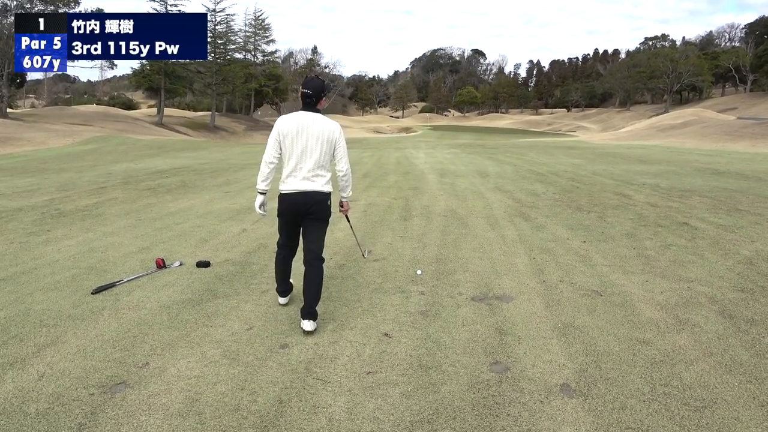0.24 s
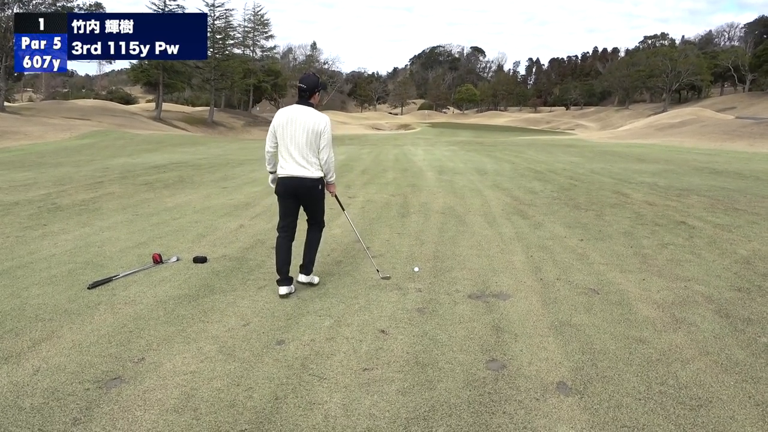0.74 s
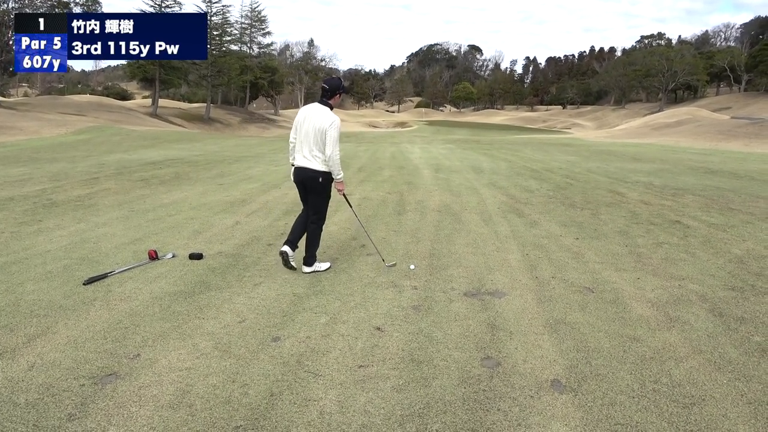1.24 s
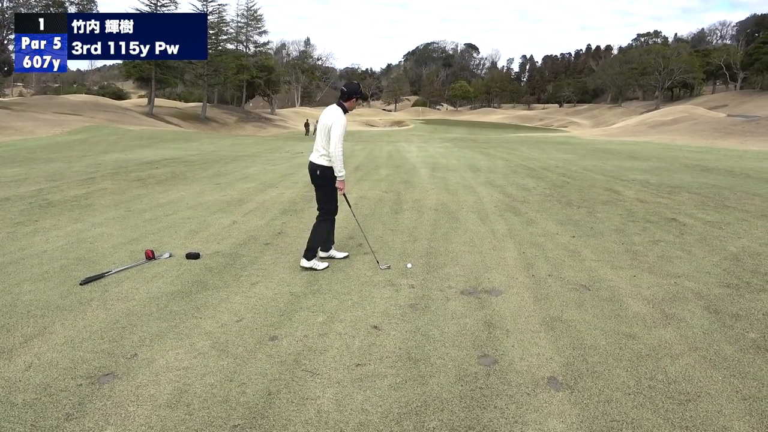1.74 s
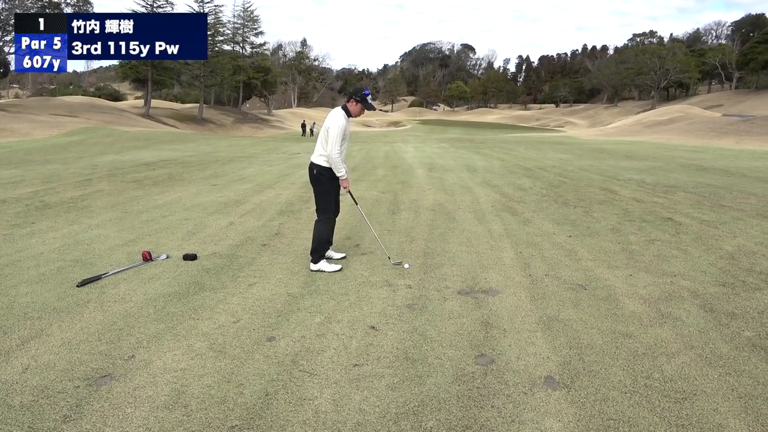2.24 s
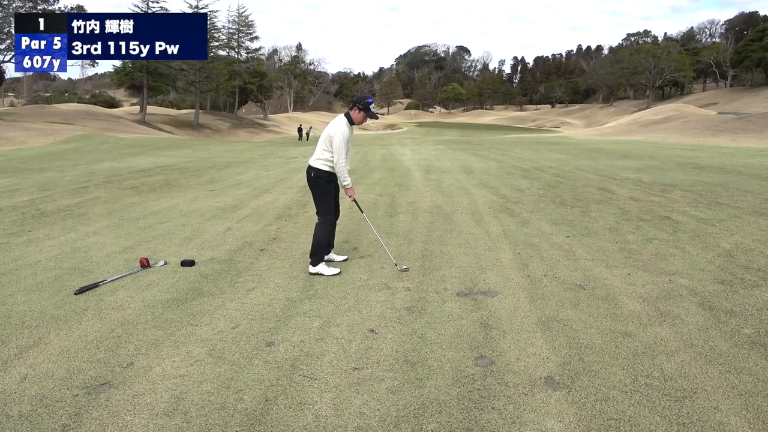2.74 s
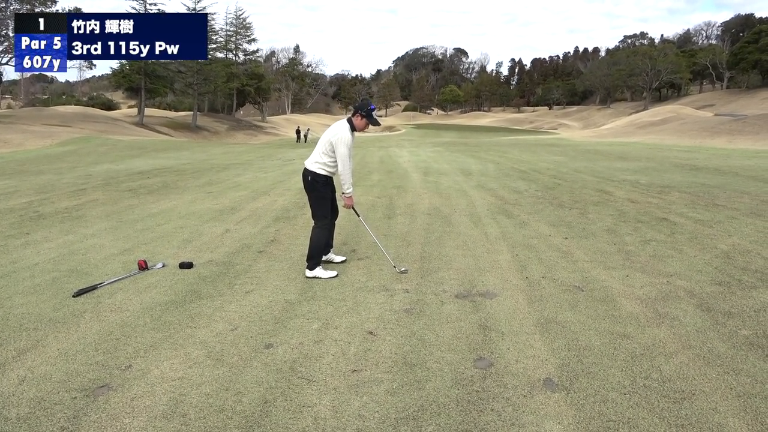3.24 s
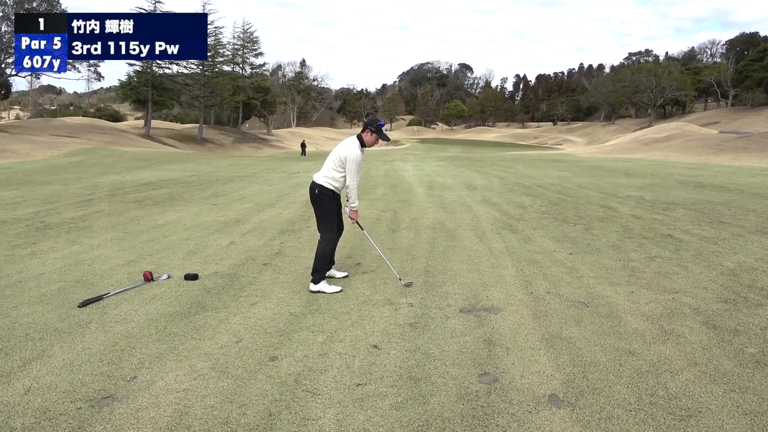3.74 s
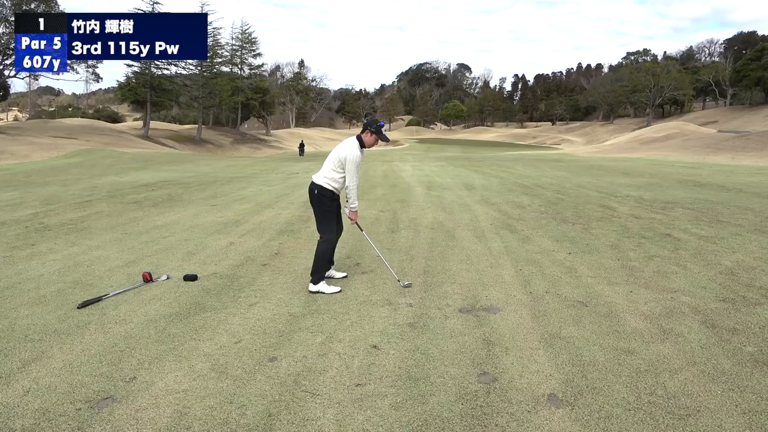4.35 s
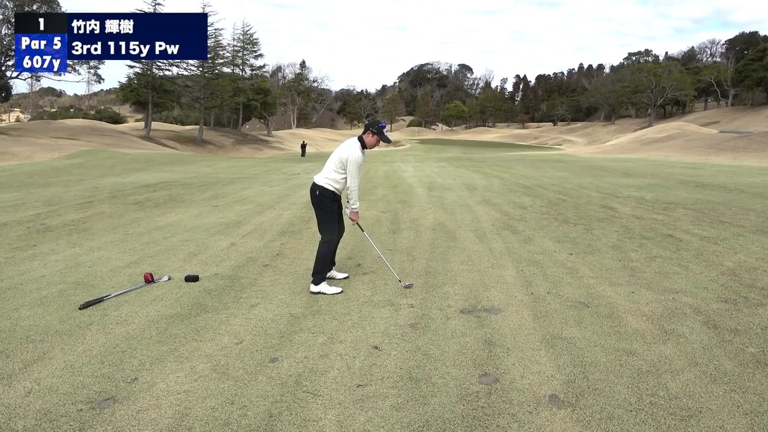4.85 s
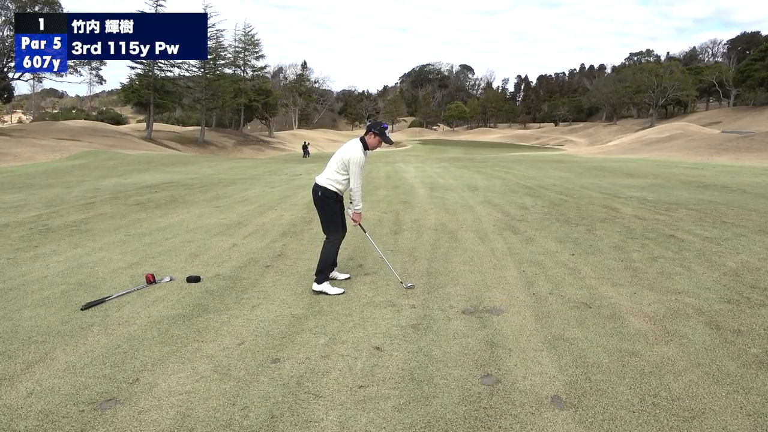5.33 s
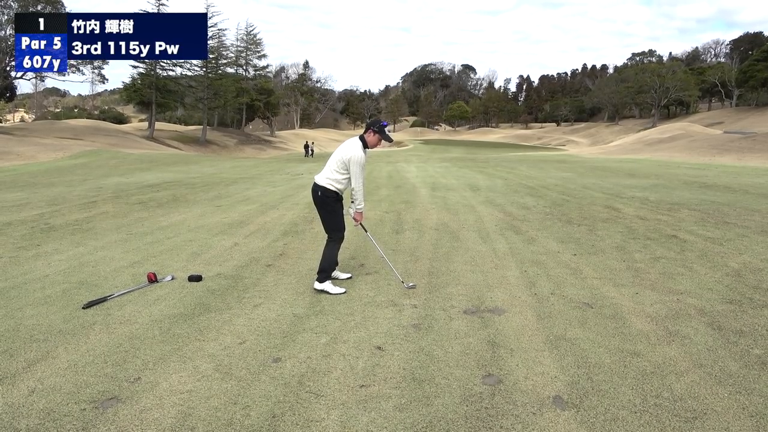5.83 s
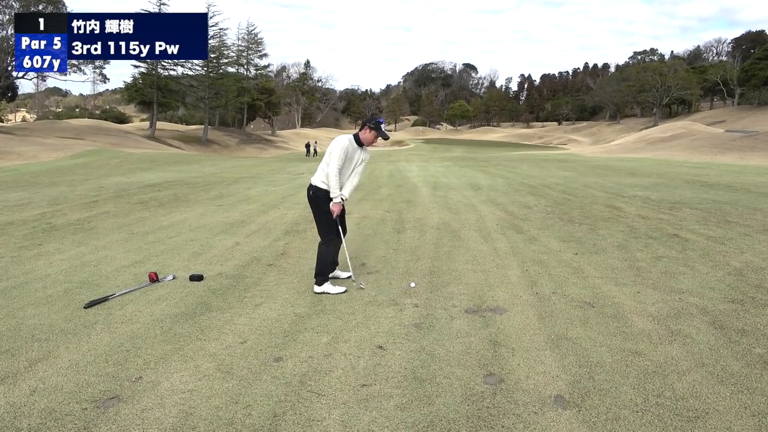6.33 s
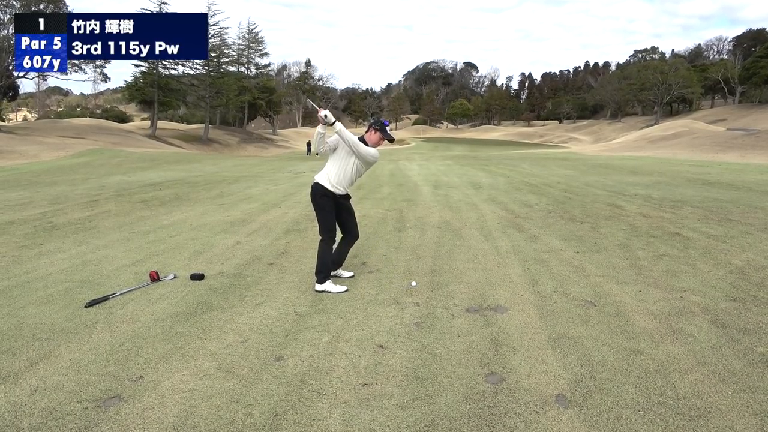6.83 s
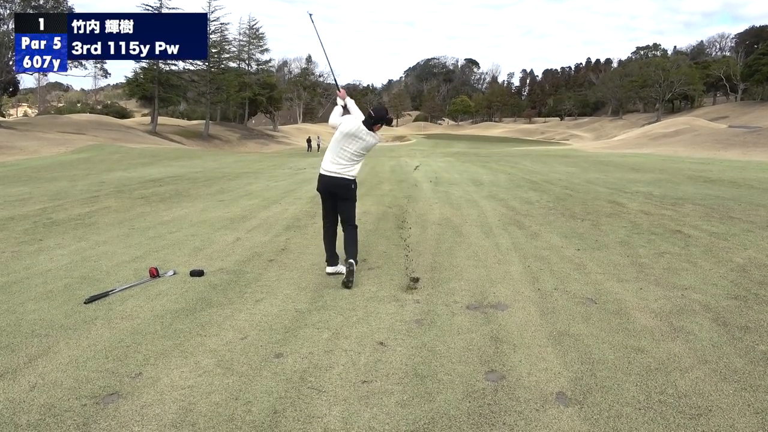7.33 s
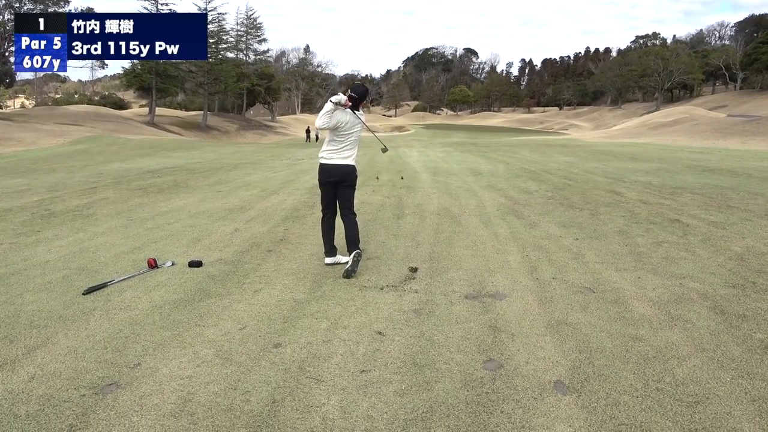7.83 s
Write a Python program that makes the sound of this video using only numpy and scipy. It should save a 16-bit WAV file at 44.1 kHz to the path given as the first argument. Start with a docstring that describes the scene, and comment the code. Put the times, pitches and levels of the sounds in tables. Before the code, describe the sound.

Low, clipped wind noise dominates throughout, over distant trees roaring softly and faint hiss. Two abrupt edits pop, one right at the start and one before the midpoint. Faint steps and grass scuffs come early, then tiny ticks. Near the end a fast whoosh leads into a hard, dry golf shot with a tearing divot, grassy debris and a last gust.

```python
"""A wedge shot on a windy fairway, heard by an unshielded microphone a few metres away.
Filtered-noise gusts overload the capsule from the start, over far trees, rustling dry grass and hiss; rough
buffeting stops at the first of two hard edit cuts, which pop. Zigzag buzzes, noise sweeps of feet in grass and
ringing ticks follow. Near 7 s the club swings back and swishes as swelling noise, clicks the ball with a pulse and
ringing modes, and tears the turf in a noise burst; grainy soil sprays and patters, chaff rustles, clods tick down."""
import sys
import numpy as np
from scipy import signal
from scipy.fft import rfft, irfft, next_fast_len
from scipy.io import wavfile
from scipy.ndimage import uniform_filter1d

SR = 44100
rng = np.random.default_rng(int(sys.argv[2]) if len(sys.argv) > 2 else 0)


def boost_factor(decibels):
    """Convert a level in decibels to a linear amplitude factor."""
    exponent = np.asarray(decibels, float) / 20
    return 10 ** exponent


def waveform_to_disk(signal):
    """Save audio, clipped to [-1, 1], as 16-bit WAV at the path in sys.argv[1]."""
    frames = np.transpose(np.atleast_2d(signal))
    scaled = np.clip(frames, -1, 1) * 32767
    samples = np.round(scaled).astype(np.int16)
    wavfile.write(sys.argv[1], SR, samples)


N = 356328
TIME_S = np.arange(N) / SR
DIVOT_S, DIVOT_RISE_S = 7.148, 0.0036   # the sole cuts the turf


def rms_one(x):
    """Scale to unit rms."""
    return x / np.sqrt(np.mean(x ** 2) + 1e-20)


def drift(rate):
    """Slow chance: straight lines between normal draws, `rate` of them per second."""
    knots = rng.standard_normal(int(N / SR * 100) + 4)
    return np.interp(TIME_S * rate, np.arange(len(knots)), knots)


def coloured(spectrum, source):
    """Give a white source the spectrum's shape, silent beyond its ends, at unit rms."""
    size = next_fast_len(N)
    hz, db = np.transpose(spectrum)
    log_hz = np.log(np.arange(size // 2 + 1) * SR / size + 1)
    gain = boost_factor(np.interp(log_hz, np.log(hz), db, left=-200, right=-200))
    return rms_one(irfft(rfft(source, size) * gain, size)[:N])


def lumpy(spectrum, patchy_db, rate):
    """Coloured noise whose strength wavers in lumps."""
    return coloured(spectrum, rng.standard_normal(N) * boost_factor(patchy_db * drift(rate)))


def evened(x, window_s):
    """Flatten the chance swells of a narrow noise so that the gust alone sets its strength."""
    size = int(window_s * SR)
    power = uniform_filter1d(uniform_filter1d(x ** 2, size), size)
    return x / np.sqrt(power + 0.0085)


def grains(per_s, spread_db):
    """Random snaps of blades and soil, few large and many small, at unit rms."""
    sizes = boost_factor(spread_db * np.minimum(rng.exponential(1, N), 5))
    signed = sizes * rng.choice([-1, 1], N)
    return rms_one(signed * (rng.random(N) < per_s / SR))


def swell(s, db, rise_s, fade_s):
    """Exponential rise to a peak at s, exponential fade after it."""
    since = TIME_S - s
    return boost_factor(db) * np.exp(np.where(since < 0, since / rise_s, -since / fade_s))


def bell(s, rise_s, fall_s):
    """Smooth swell to 1 at s, with its own width on each side."""
    since = TIME_S - s
    return np.exp(-(since / np.where(since < 0, rise_s, fall_s)) ** 2 / 2)


def bandpass(x, order, low_hz, high_hz):
    """Keep one band of the sound."""
    return signal.sosfilt(signal.butter(order, [low_hz, high_hz], "band", fs=SR, output="sos"), x)


def ring_noise(hz, width_hz):
    """Noise through a narrow band around hz."""
    return bandpass(rng.standard_normal(N), 2, hz - width_hz / 2, hz + width_hz / 2)


def ring(events, hz, t60):
    """Clicks at (s, dB) set a sine ringing that decays by 60 dB in t60 seconds."""
    clicks = np.full(N, 1e-18)   # a trace of signal keeps the resonator's arithmetic fast
    for s, db in events:
        clicks[round(s * SR)] = boost_factor(db)
    r, w = boost_factor(-60 / (t60 * SR)), 2 * np.pi * hz / SR
    return signal.lfilter([0, np.sin(w)], [1, -2 * r * np.cos(w), r * r], clicks)


# Wind at the capsule: t/s, strength level/dB, fineness of the eddies/dB (lifts thuds and flutter)
WIND = [(0, -6, 0), (.2, -13.5, 3.5), (.36, -6.5, -1), (.75, -7, 0), (1.1, -12, 1), (1.33, -8.5, 3),
        (1.55, -13.5, 1.5), (2.0, -16.5, 3), (2.22, -14, 0), (2.39, -27, -4.5), (2.5, -11, -4.5),
        (2.62, -16.5, 0.5), (2.9, -10, -0.5), (3.3, -12.5, 2), (3.78, -17, -2.5), (3.95, -8, -5.5),
        (4.25, -8.5, -4.5), (4.62, -17.5, 1.5), (4.95, -12, 0), (5.28, -11.5, -2.5), (5.55, -13.5, 1.5),
        (5.84, -17, -3), (5.92, -9.5, -3.5), (6.3, -10, -2), (6.43, -17.5, -3), (6.5, -11.5, -3),
        (6.8, -9, -2), (7.07, -13, -4.5), (7.2, -19, -4), (7.4, -22.5, -11.5), (7.52, -19.5, -4),
        (7.73, -22.5, -4.5), (7.79, -9, 1), (8.02, -6.5, 2.5), (8.08, -20.5, 5)]
# Small sharp eddies that thump the capsule: t/s, lift level/dB
PUFFS = [(.11, 3), (.4, 6), (.72, 5.5), (1.15, 2), (1.35, 4.5), (1.63, 5.5), (2.48, 3.5), (3.38, 3.5),
         (3.96, 3.5), (4.78, 5.5), (4.94, 4.5), (5.28, 2.5), (5.68, 4.5), (5.89, 4), (5.99, 6), (6.07, 4),
         (6.17, 4.5), (6.28, 4), (6.34, 2), (6.48, 6.5), (6.67, 5), (6.78, 7), (7.0, 2.5), (7.58, 0.5),
         (7.79, 4.5), (7.87, 2.5), (7.99, 3)]
# Spectra of the three wind layers: f/Hz, relative level/dB per Hz
RUMBLE = [(7.1, -18), (12, -0.5), (27, 0), (45, -6.5), (58, -32), (99, -120)]
THUD = [(26, -32), (45, -0.5), (110, -18), (140, -50.5), (240, -120)]
FLUTTER = [(65, -32), (110, -3.5), (200, -13.5), (400, -32.5), (630, -46), (1200, -62.5), (2600, -92.5)]
RUMBLE_DB, THUD_DB, FLUTTER_DB = -0.5, -7.5, -24.5   # each layer against the wind's strength
THUD_FOLLOWS = 0.95   # dB per dB of strength
EDDY_DB, THUD_EDDY_DB, EDDIES_PER_S = 2.5, 1.5, 14   # single eddies swell and fade around the gust
PUFF_S = .025


def wind(top=1.6):
    """Eddies push the capsule: rumble, thuds and flutter; the diaphragm stiffens at large swings."""
    s, strengths, finenesses = np.transpose(WIND)
    strength_db = np.interp(TIME_S, s, strengths)
    fine_db = np.interp(TIME_S, s, finenesses)
    mean_db = strength_db.mean()
    puffs_db = sum(db * bell(at, PUFF_S, PUFF_S) for at, db in PUFFS)
    sharp_db = puffs_db + THUD_EDDY_DB * drift(EDDIES_PER_S)

    rumble_db = strength_db + RUMBLE_DB + EDDY_DB * drift(EDDIES_PER_S)
    thud_db = mean_db + THUD_FOLLOWS * (strength_db - mean_db) + THUD_DB + fine_db + sharp_db
    flutter_db = strength_db + FLUTTER_DB + fine_db + 0.95 * sharp_db

    rumble = evened(coloured(RUMBLE, rng.standard_normal(N)), window_s=0.098)
    thud = evened(coloured(THUD, rng.standard_normal(N)), window_s=0.096)
    push = boost_factor(rumble_db) * rumble + boost_factor(thud_db) * thud
    shed = 1 + 0.39 * uniform_filter1d(thud ** 2, size=600)   # flutter is shed by the stronger thuds
    flutter = boost_factor(flutter_db) * lumpy(FLUTTER, patchy_db=0.5, rate=40) * shed
    return top * np.tanh((push + flutter) / top)


# Spectrum of the rough close buffeting: f/Hz, relative level/dB per Hz
BUFFET = [(120, -36), (200, -3), (594, -8), (696, -12.5), (762, -3.5), (863, -21), (1020, -16.5),
          (1600, -31.5), (3000, -60), (3900, -80), (6600, -120)]
BUFFET_DB = -34.5


def buffet():
    """Air tumbling right over the grille, lumpy noise silenced by the first cut."""
    return boost_factor(BUFFET_DB) * lumpy(BUFFET, patchy_db=0.5, rate=60) * (TIME_S < CUTS[0][0])


# Beds of the three stretches between the cuts: far roar level/dB, steady rustle level/dB
STRETCHES = [(-45.5, -72), (-48.5, -63.5), (-57.5, -76.5)]


def bed_levels():
    """Roar and rustle levels in dB, switched at the cuts."""
    stretch = np.searchsorted([s for s, _ in CUTS], TIME_S)
    return np.array(STRETCHES)[stretch].T


# Spectrum of the far trees: f/Hz, relative level/dB per Hz
ROAR = [(180, -27.5), (300, 0.5), (480, -3.5), (630, -9), (970, -17), (1300, -28), (2000, -37), (4000, -50)]
# Faint tones around which level and phase waver: f/Hz, level/dB
HUMS = [(480, -57), (630, -60), (955, -67)]
ROAR_SWELL_DB, ROAR_FADE_S = 11.5, 0.28   # the roar swells up to the first cut and dies down after it


def trees():
    """Smooth far roar of noise, with faint wavering tones between the two cuts."""
    first_s, second_s = CUTS[0][0], CUTS[1][0]
    roar_db = bed_levels()[0] + ROAR_SWELL_DB * np.exp(-abs(TIME_S - first_s) / ROAR_FADE_S)
    roar = boost_factor(roar_db) * lumpy(ROAR, patchy_db=1.5, rate=20)
    tones = np.zeros(N)
    for hz, db in HUMS:
        tone = np.sin(2 * np.pi * hz * TIME_S + 0.57 * drift(12))
        tones += tone * boost_factor(db + 1.2 * drift(3.2))
    return roar + tones * (TIME_S > first_s) * (TIME_S < second_s)


# Shoes, club and clothes brush by: t/s, peak level/dB, fade/s
BRUSHES = [(.044, -53, .04), (.425, -57, 0.03), (.525, -58.5, .03),  (.955, -61, 0.022), (1.05, -60, 0.05),
           (3.12, -59.5, .05), (5.12, -65, .006), (6.2, -70.5, .08), (6.94, -63.5, 0.11), (7.0, -68, 0.037),
           (7.38, -62, 0.031), (8.0, -67, .02)]
# Spectrum of rustling grass: f/Hz, relative level/dB per Hz
RUSTLE = [(710, -28.5), (1200, -1.5), (6850, -14), (8400, -14), (10100, -22.5), (12800, -17.5),
          (15700, -26)]
RUSTLE_FLICKER_DB, RUSTLE_FLICKERS_PER_S = 2, 30
BRUSH_RISE_S = 0.011   # or the fade time, if that is shorter
BLADES_DB, BLADES_FADE_S = -46.5, 0.08   # cut grass thrown up


def grass():
    """Hiss with a share of tiny snaps: a flickering bed, the brushes and the grass that the club throws."""
    bed = boost_factor(bed_levels()[1] + RUSTLE_FLICKER_DB * drift(RUSTLE_FLICKERS_PER_S))
    brush_power = sum(swell(s, db, min(BRUSH_RISE_S, fade_s), fade_s) ** 2 for s, db, fade_s in BRUSHES)
    thrown = swell(DIVOT_S, BLADES_DB, DIVOT_RISE_S, BLADES_FADE_S)
    level = np.sqrt(bed ** 2 + brush_power + thrown ** 2)
    source = rng.standard_normal(N) + 0.44 * grains(per_s=4500, spread_db=6.0)
    return level * coloured(RUSTLE, source)


# Spectrum of the microphone's self-noise: f/Hz, relative level/dB per Hz
HISS = [(710, -30), (1200, -1), (2690, -7), (2900, -6.5), (5640, -11.5), (10600, -18.5), (15000, -21.5),
        (15700, -18)]
HISS_DB = -69


def hiss():
    """Steady self-noise of the microphone."""
    return boost_factor(HISS_DB) * coloured(HISS, rng.standard_normal(N))


# Hard edit cuts: t/s, level/dB of the drop in pressure
CUTS = [(.14409, -1.5), (3.64758, -11.5)]


def cuts(settle_s=0.011):
    """Unrelated pressures meet: high before the join, low after it."""
    pops = np.zeros(N)
    for s, db in CUTS:
        since = TIME_S - s
        pops -= boost_factor(db) / 2 * np.sign(since) * np.exp(-abs(since) / settle_s)
    return pops


# Brief narrow hisses, near the shoes and faint high ones: t/s, level/dB, half length/s, f/Hz, width/Hz
WHEEZES = [(.308, -50, .012, 1150, 300), (.308, -63, .01, 2500, 300), (.428, -58, .016, 2800, 1200),
           (.527, -59, .006, 3200, 500), (5.41, -85, .06, 12000, 900), (5.7, -87, .06, 12000, 900)]


def wheezes():
    """Each a soft swell of noise around one pitch."""
    out = np.zeros(N)
    for s, db, span_s, hz, width_hz in WHEEZES:
        out += boost_factor(db) * rms_one(ring_noise(hz, width_hz)) * bell(s, span_s, span_s)
    return out


# Short buzzes of the overdriven capsule:
# t/s, zigzag level/dB before pace and filters, length/ms, nominal f/Hz that the pace bends
BUZZES = [(0.339, -43.5, 4.5, 1200), (.36, -47, 2, 1200), (.405, -47, 3.5, 1000), (0.4283, -43, 4, 1200),
          (.443, -47, 4, 1200), (.47, -47, 2, 900), (.502, -43, 4, 1183), (.52, -44, 3, 1000),
          (0.568, -36, 6.8, 849), (0.6232, -45.5, 3, 1200), (0.629, -42, 4.8, 1197), (.641, -46, 3, 1100),
          (.705, -45, 2, 1200), (.735, -47, 2, 1000), (3.922, -40, 4.6, 1550), (3.9605, -36.5, 2.6, 733),
          (4.1685, -36.5, 2.44, 960), (5.005, -39.5, 2.1, 1200), (5.278, -38, 2.7, 999),
          (6.045, -38, 7.8, 1400), (6.067, -46, 1.1, 1500), (6.0742, -46, 1.1, 1500),
          (6.1225, -39.5, 4.2, 1650), (6.675, -43, 1.2, 1400), (6.68, -38, 3.5, 1250),
          (6.7775, -39, 3.2, 1700), (6.803, -47, 1.2, 1400), (6.8085, -39.5, 3, 1400),
          (7.954, -49, 2.8, 1156), (8.0, -37, 1.6, 1196), (8.029, -39, 3.7, 1100)]
BUZZ_HURRY, BUZZ_FASTEST, BUZZ_UNEVEN = .5, .4, .3   # rate bend (ln), where it peaks (0-1), chance in it (ln)
BUZZ_STOP_HZ, BUZZ_RING_HZ = 3000, 3900   # the capsule dulls the corners but rings at one pitch
BUZZ_RING_DB, BUZZ_EDGE_DB = 2.5, -12   # ringing, and the share of corners left sharp


def buzzes():
    """A sharp-cornered zigzag of steady slope: wide slow swings open and close it, small quick ones between."""
    out, wobble = np.zeros(N), rng.standard_normal((len(BUZZES), 8))
    for (s, db, ms, hz), knots in zip(BUZZES, wobble):
        u = np.linspace(0, 1, int(ms / 1000 * SR))
        hurry = BUZZ_HURRY * np.interp(u, [0, BUZZ_FASTEST, 1], [-1, 1, -1])
        uneven = BUZZ_UNEVEN * np.interp(u, np.linspace(0, 1, len(knots)), knots)
        pace = np.exp(hurry + uneven)
        phase = 2 * np.pi * np.cumsum(hz * pace) / SR - np.pi / 2
        zigzag = signal.sawtooth(phase, .5) / pace * signal.windows.tukey(len(u), .15)
        at = round(s * SR)
        out[at:at + len(u)] -= boost_factor(db) * (zigzag + 3.5 * np.bartlett(len(u)))   # rides on a pointed dip
    rung = signal.lfilter(*signal.iirpeak(BUZZ_RING_HZ, 6.0, fs=SR), out)
    dulled = signal.sosfilt(signal.cheby2(6, 30, BUZZ_STOP_HZ, fs=SR, output="sos"), out)
    edge = boost_factor(BUZZ_EDGE_DB)
    return dulled * (1 - edge) + edge * out + boost_factor(BUZZ_RING_DB) * rung


# A foot, or at 6.89 s the club's backswing, sweeps through the grass and stops:
# t/s, length/s, sweep level/dB, stop level/dB
SWEEPS = [(.35, .215, -67.5, -55.5), (0.898, .285, -68.5, -61.5), (1.624, .27, -68, -62),
          (2.18, .13, -67, -61), (2.592, 0.14, -68.5, -67.5), (2.98, .2, -66.5, -68), (3.438, .2, -67, -67),
          (6.89, .17, -72, -74)]
# Single stalks snap underfoot: t/s, level/dB (each swell is played 8 dB lower)
SNAPS = [(0.541, -46.5), (0.9005, -51.5), (0.9353, -46.5), (0.9506, -40.5), (0.983, -43.5), (1.0265, -47),
         (1.6246, -49.5), (1.684, -48), (2.1854, -50), (2.987, -50), (3.114, -47)]
# Spectrum of the blades: f/Hz, relative level/dB per Hz
BLADES = [(1000, -31.5), (2000, -1.5), (5000, -2), (7080, -7), (8510, -0.5), (10400, -10.5), (13000, -4),
          (15700, -10)]
# scuff as a sweep starts (dB over the sweep), crunch as it stops
SCUFF_DB, SCUFF_FADE_S, CRUNCH_RISE_S, SWEEP_EDGE_S = 4.5, .025, 0.029, 0.0055
SNAP_FADE_S = .005
CHAFF_DB, CHAFF_FADE_S = -64, 1.2   # cut grass drifting down


def sweeps():
    """Bright swish that switches on as a sweep starts and off as it stops; divot chaff rustles alike."""
    power = swell(DIVOT_S, CHAFF_DB, DIVOT_RISE_S, CHAFF_FADE_S) ** 2
    for s, length_s, db, stop_db in SWEEPS:
        end_s = s + length_s
        sweep = boost_factor(db) * np.clip(np.minimum(TIME_S - s, end_s - TIME_S) / SWEEP_EDGE_S, 0, 1)
        scuff = swell(s + SWEEP_EDGE_S, db + SCUFF_DB, SWEEP_EDGE_S / 2, SCUFF_FADE_S)
        crunch = swell(end_s - SWEEP_EDGE_S, stop_db, CRUNCH_RISE_S, SWEEP_EDGE_S / 2)
        power += sweep ** 2 + scuff ** 2 + crunch ** 2
    for s, db in SNAPS:
        power += swell(s, db - 8, SNAP_FADE_S / 2, SNAP_FADE_S) ** 2
    level = np.sqrt(power) * boost_factor(1.5 * drift(40))
    source = rng.standard_normal(N) + 0.44 * grains(per_s=2000, spread_db=5.5)
    return level * coloured(BLADES, source)


# Tiny dry ticks close by: t/s, level/dB, f/Hz
TICKS = [(1.69, -51.5, 5000), (5.19, -57, 8200), (5.535, -47.5, 2700), (5.535, -56, 1500),
         (5.535, -55.5, 4200), (6.866, -55, 5000), (7.004, -55, 4000), (7.5755, -47, 8000),
         (7.5825, -53.5, 8000), (7.74, -57, 8400)]
TICK_CYCLES = 18   # cycles in which a tick falls by 60 dB
BLIP_S, BLIP_DB, BLIP_HZ, BLIP_SPAN_S = 5.895, -56, 760, .012   # a faint short tone


def ticks():
    """Each rings a few cycles at its own pitch; one soft tone passes among them."""
    tone = np.sin(2 * np.pi * BLIP_HZ * TIME_S)
    blip = boost_factor(BLIP_DB) * bell(BLIP_S, BLIP_SPAN_S, BLIP_SPAN_S) * tone
    return sum(ring([(s, db)], hz, TICK_CYCLES / hz) for s, db, hz in TICKS) + blip


# Spectrum of the torn air and the soil: f/Hz, relative level/dB per Hz
SWISH = [(180, -50.5), (300, -20), (425, -13.5), (518, -9.5), (851, -13.5), (1070, -12), (2220, -17),
         (2410, -16), (4310, -24.5), (4920, -22), (7000, -29), (8500, -26), (10000, -34), (12800, -33.5),
         (15700, -42.5)]
FASTEST_S, SWISH_DB, SPEED_UP_S, STOP_S = 7.122, -36, 0.027, 0.022   # loudest just before the ball
# the treble needs more speed, so it comes later
BRIGHT_HZ, BRIGHT_LAG_S, BRIGHT_SPEED_UP_S = 2000, 0.0056, 0.024
# the shaft hoots as it sheds eddies
SHAFT_S, SHAFT_DB, SHAFT_HZ, SHAFT_WIDTH_HZ, SHAFT_SPAN_S = 7.118, -36.5, 560, 120, 0.014
DIVOT_DB, DIVOT_FADE_S = -25.5, 0.0071
SPRAY_DB, SPRAY_FADE_S = -45.5, 0.059   # soil flies up
PATTER_S, PATTER_DB, PATTER_RISE_S, PATTER_FADE_S = 7.35, -54.5, 0.18, 0.16   # and falls back


def swish():
    """Air tears smoothly past the shaft, dull first and then bright; soil sprays and patters down in grains."""
    air = coloured(SWISH, rng.standard_normal(N))
    dull = signal.sosfiltfilt(signal.butter(1, BRIGHT_HZ, fs=SR, output="sos"), air)
    dull_tear = dull * bell(FASTEST_S, SPEED_UP_S, STOP_S)
    bright_tear = (air - dull) * bell(FASTEST_S + BRIGHT_LAG_S, BRIGHT_SPEED_UP_S, STOP_S)
    hoot = rms_one(ring_noise(SHAFT_HZ, SHAFT_WIDTH_HZ)) * bell(SHAFT_S, SHAFT_SPAN_S, SHAFT_SPAN_S)

    grit = coloured(SWISH, rng.standard_normal(N) + 0.63 * grains(per_s=1200, spread_db=4.5))
    divot = swell(DIVOT_S, DIVOT_DB, DIVOT_RISE_S, DIVOT_FADE_S)
    spray = swell(DIVOT_S, SPRAY_DB, DIVOT_RISE_S, SPRAY_FADE_S)
    patter = swell(PATTER_S, PATTER_DB, PATTER_RISE_S, PATTER_FADE_S) * (TIME_S > FASTEST_S)
    soil = (divot + spray + patter) * grit
    return boost_factor(SWISH_DB) * (dull_tear + bright_tear) + soil + boost_factor(SHAFT_DB) * hoot


# Blows on the club head: t/s
BLOW_TIMES = [7.14428, 7.14511, 7.14561, 7.14678, 7.14912]
# The same blows: level/dB at the tilt pitch, brightness/dB per octave
BLOWS = [(-2.1, 2.5), (-4.6, 1.2), (-15.1, -.6), (-17.5, -1.3), (-13.5, -3.8)]
# Ringing modes of the head: f/Hz, level/dB under each blow, time to fall 60 dB/s
HEAD = [(267, -29, .033), (590, -18.5, .021), (813, -18.5, .022), (1265, -21, .01), (1440, -18, .023),
        (1762, -9, .007), (2059, -15.5, .015), (2596, -29, .038), (3214, -17, .013), (3788, -8, .0086),
        (5179, -1.4, .0025), (5362, -10.3, .0019), (6345, -8.6, .0024), (6407, -10.6, .0043),
        (8114, -4, .0028), (8896, -4.1, .0021), (10808, -24.4, .0032), (12200, -29, .008),
        (13800, -21.5, .0085)]
TILT_HZ = 2000   # brightness turns about this pitch
SOLE_S, SOLE_DB, SOLE_SPAN_S = 7.1432, -18, .0004   # the sole grazes the turf just ahead of the ball
SQUASH_S, SQUASH_MS, SQUASH_DB = 7.14438, 0.233, 10.5   # ball's pressure pulse: start, half length, height
TURF_S, TURF_DB, TURF_HZ, TURF_T60_S = 7.148, -33.5, 230, .06   # the sole thumps the ground


def club():
    """The ball squashes and springs back in one pulse; blows ring the modes, neighbours in opposite ways."""
    modes = np.zeros(N)
    for k, (hz, db, t60) in enumerate(HEAD):
        octaves = np.log2(hz / TILT_HZ)
        blows = [(s, hit_db + tilt_db * octaves) for s, (hit_db, tilt_db) in zip(BLOW_TIMES, BLOWS)]
        direction = -1 if k % 2 == 0 else 1
        modes += direction * boost_factor(db) * ring(blows, hz, t60)
    graze = -boost_factor(SOLE_DB) * bell(SOLE_S, SOLE_SPAN_S, 2 * SOLE_SPAN_S)
    phase = (TIME_S - SQUASH_S) / SQUASH_MS * 1000   # in half lengths
    pulse = boost_factor(SQUASH_DB) * np.sin(np.pi * phase) * (phase > 0) * (phase < 2)
    return modes + graze + pulse + ring([(TURF_S, TURF_DB)], TURF_HZ, TURF_T60_S)


CRACK_DB, CRACK_T60_S = -25, 0.014   # turf and ball cover tearing at the blow; level before the filter


def crack():
    """A broad burst of noise that dies at once."""
    since = TIME_S - BLOW_TIMES[0]
    burst = boost_factor(CRACK_DB - 60 * np.clip(since, 0, 1) / CRACK_T60_S) * (since > 0)
    return bandpass(burst * rng.standard_normal(N), 2, 900, 13000)


# Clods of turf landing: t/s, level/dB of the dull body
CLODS = [(7.5755, -35.5), (7.5787, -49), (7.5825, -40), (7.74, -43), (7.89, -47)]
CLOD_HZ, CLOD_T60_S = 1800, .003
CLOD_SNAP_DB = 1.5   # dry edge of each landing over its body, before the filter


def clods():
    """Dry ticks: a dull ringing body with a broad filtered snap on top."""
    snap = np.zeros(N)
    for s, db in CLODS:
        snap[round(s * SR)] = boost_factor(db + CLOD_SNAP_DB)
    return ring(CLODS, CLOD_HZ, CLOD_T60_S) + bandpass(snap, 1, 3000, 11000)


def scene():
    """All sources at one microphone."""
    air = wind() + buffet() + trees() + grass() + hiss()
    early = cuts() + wheezes() + buzzes() + sweeps() + ticks()
    shot = swish() + club() + crack() + clods()
    return (air + early + shot)[None]


def roll_off(x):
    """The treble ends steeply here."""
    return signal.sosfilt(signal.butter(12, 15820, fs=SR, output="sos"), x)


def record(dry):
    """Peaks beyond full scale, as in the strongest gusts and the blow, are clipped flat."""
    clipped = np.clip(dry, -1, 1)
    return roll_off(clipped)


dry = scene()
out = record(dry)
waveform_to_disk(out)
```